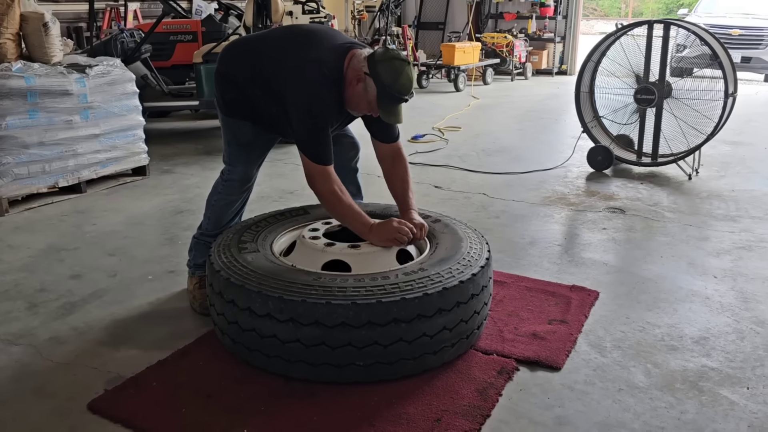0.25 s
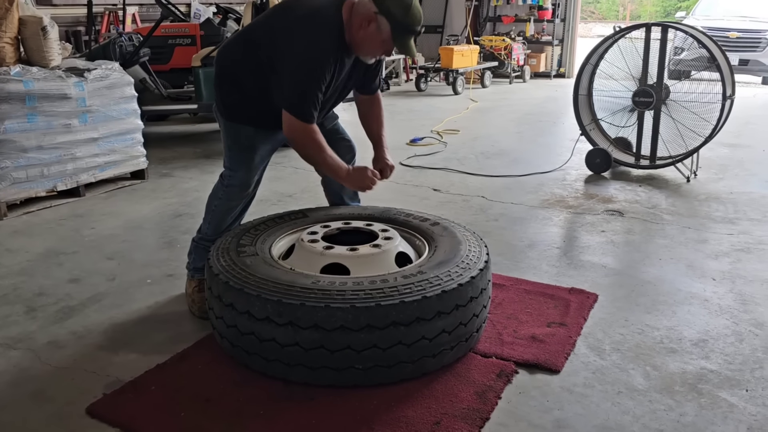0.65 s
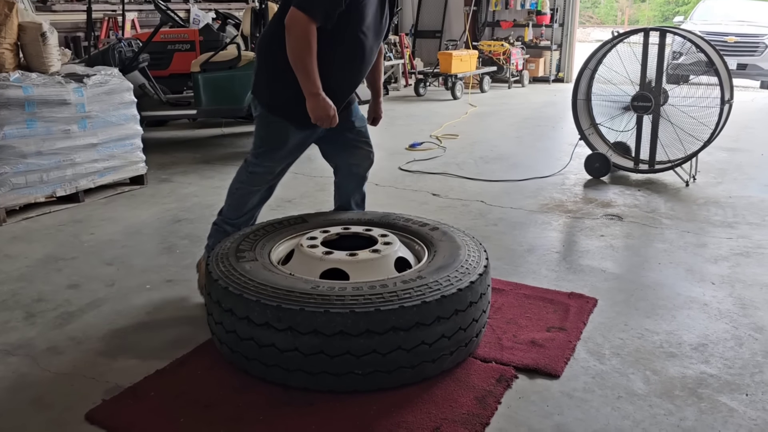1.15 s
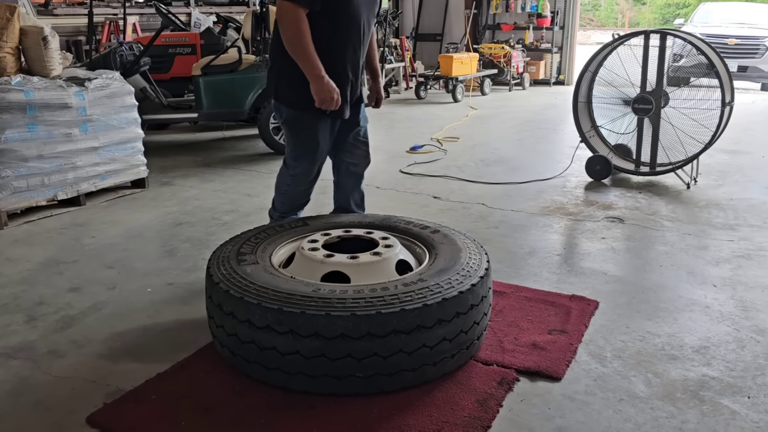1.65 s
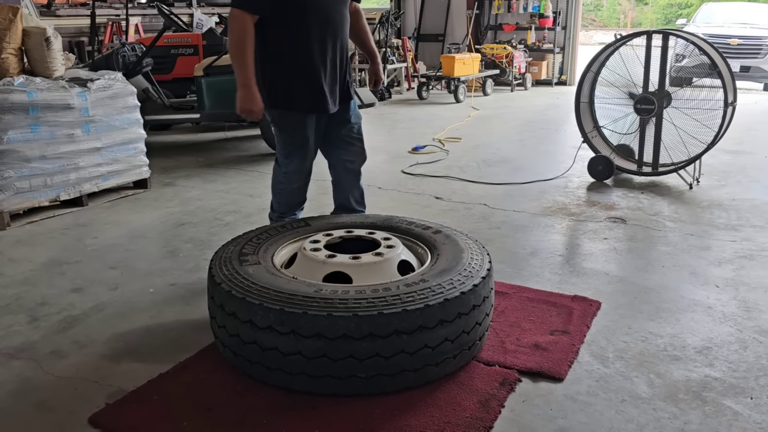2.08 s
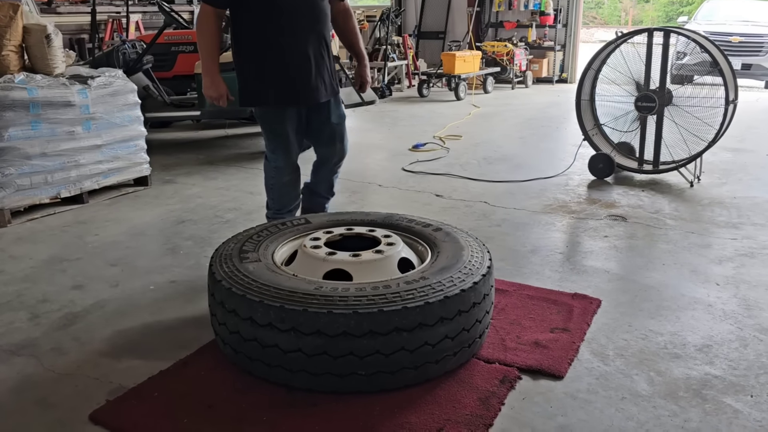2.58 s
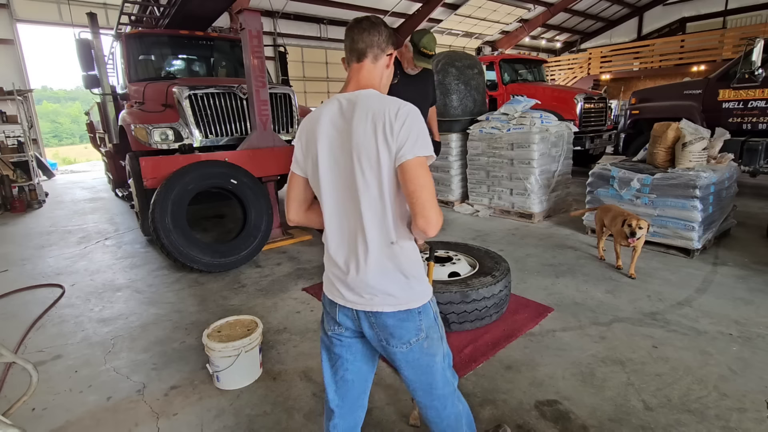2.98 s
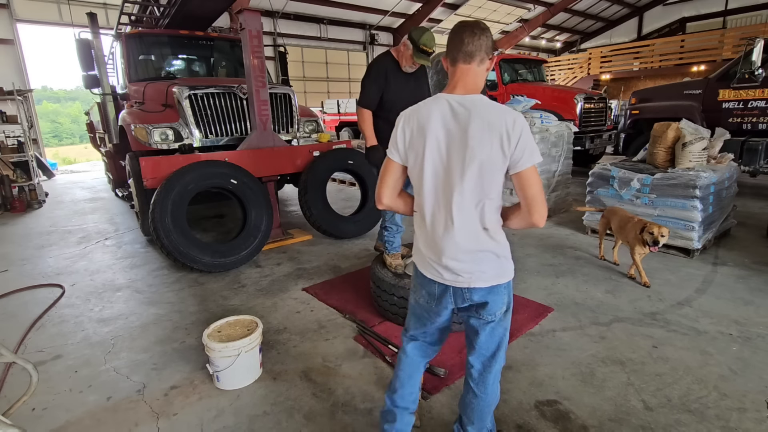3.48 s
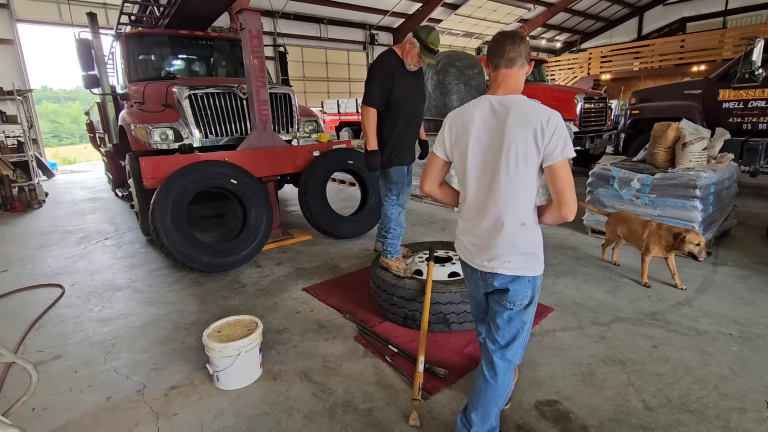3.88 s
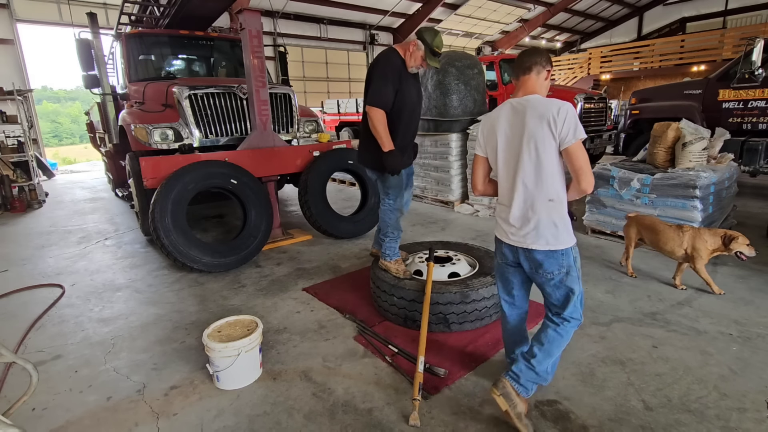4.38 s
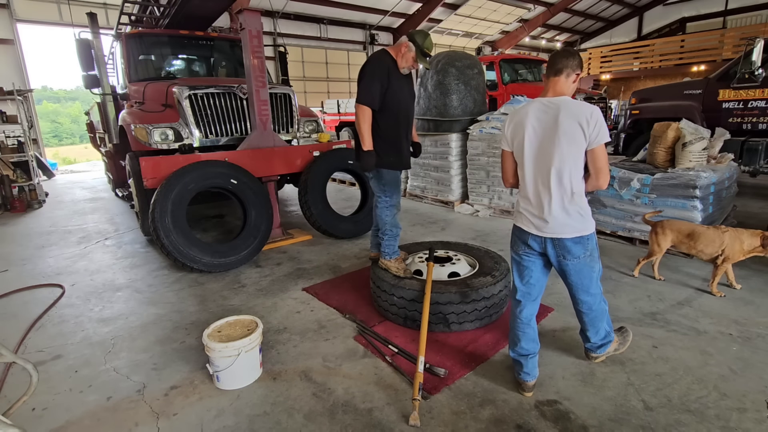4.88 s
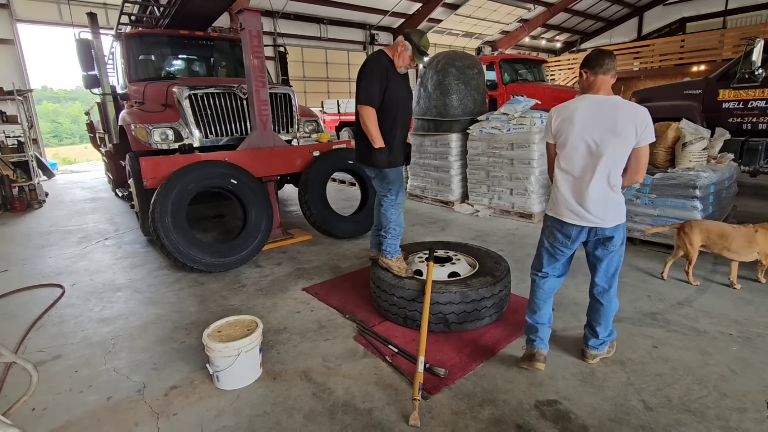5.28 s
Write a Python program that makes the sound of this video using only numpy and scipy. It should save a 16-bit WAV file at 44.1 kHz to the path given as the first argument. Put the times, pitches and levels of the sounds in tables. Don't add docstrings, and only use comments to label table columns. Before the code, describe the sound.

From the very start, air rushes loudly out of a truck tyre valve, close to a stereo microphone. The first 0.1 second has a slight pop with low buffeting and a quick pinch; until about 0.4 the jet beats on hands, denser and fluttering, then muffled by palms before they let go. From 0.5 to 3.0 it is a steady, bright, wide hiss with thin breathy whistles, slowly opening up a little, with small flaps near 2.5 and 2.9. A drum fan drones low beneath, and soft low thuds fall near 0.1 and 0.95. At 3.0 a hard cut stops the hiss. Much quieter, the fan now hums and flutters from the right in a concrete hall. Faint dry scuffs of boots and paws patter from 3.15 to 5.4, with a dull footfall at 3.5 and a short hard knock at 4.35. The fan continues to the end, about 5.5 seconds.

```python
import sys
import numpy as np
from scipy import signal
from scipy.fft import rfft, irfft, next_fast_len
from scipy.io import wavfile

SR = 44100
rng = np.random.default_rng(int(sys.argv[2]) if len(sys.argv) > 2 else 0)


def digitize_waveform(pressure):
    field = np.atleast_2d(pressure).T
    bounded = np.clip(field, -1, 1)
    quanta = np.round(bounded * 32767).astype(np.int16)
    wavfile.write(sys.argv[1], SR, quanta)


def volts_from_db(level):
    exponent = np.asarray(level, float) / 20
    return 10 ** exponent


N = 244266
SIZE = next_fast_len(N)
HZ = np.maximum(np.arange(SIZE // 2 + 1) * SR / SIZE, 1)

# frequency in Hz, density in dB per Hz.
JET_COLOUR = [(290, -33), (500, -23), (900, -21), (1500, -17), (2500, -7.5), (3000, -4.5), (3500, -3.5),
              (4420, -3), (5720, -2.5), (7410, 0.5), (9500, -1.5), (11700, 2), (14000, -4), (15500, -3.5)]
HANDS_COLOUR = [(210, -50), (350, -22), (460, -13), (920, -6), (1850, 1.5), (2700, 7.5), (3420, 5),
                (4500, 4.5), (5150, 2.5), (5500, 1), (5980, 3), (6600, 0.5), (8050, 7), (9300, -2),
                (10200, 12), (11600, 6), (14000, 0.5), (15500, 0.5)]
# frequency in Hz, width in Hz, height over hiss in dB.
WHISTLES = [(1500, 90, 3), (1880, 90, 4), (2672, 25, 4), (4520, 60, 3), (6100, 200, 2), (6505, 30, 4),
            (6970, 30, 3), (7205, 40, 4), (7750, 60, 2), (11350, 40, 3), (11714, 40, 4), (12165, 50, 3),
            (14250, 200, 2), (15250, 350, 5)]
# frequency in Hz, width in Hz, gain in dB.
HOLLOWS = [(1193, 110, -13.5), (1687, 120, -8), (2014, 43, -10.5), (2535, 540, -9.5), (5140, 230, 9),
           (6070, 250, 3.5), (10600, 1340, -9)]
# frequency in Hz, width in Hz, gain in dB.
SLITS = [(2880, 50, -6), (3200, 70, -11), (3620, 60, -8), (5100, 80, -10), (5950, 80, -6)]
# frequency in Hz, width in Hz, gain in dB.
NEAR_HANDS = [(3100, 140, -19), (4450, 100, -6), (5100, 70, -10), (5460, 440, 1.5), (5760, 85, -7),
              (10400, 800, -5), (13000, 5500, 4)]
# frequency in Hz, gain in dB.
FINGERS_COLOUR = [(1000, 6), (2200, 0.5), (3200, -24), (5000, 3), (7000, -7), (10000, 3), (15000, 3)]
# frequency in Hz, gain in dB.
PALMS_COLOUR = [(500, 7.5), (1100, 1.5), (2500, -1), (4000, -0.7), (8000, 1.8), (11000, -9), (15000, -10)]
# time in seconds, peak in dB.
RIM_FLAPS = [
    (2.51, -30),
    (2.9, -28),
]
WAVERING_HZ = [1950, 2180, 2480, 2700, 2920, 3130, 3260, 3480, 3720, 3950, 4150, 5100]
# frequency in Hz, width in Hz, start and end in seconds.
FINGER_GAPS = [(5150, 90, 0, .2), (5950, 90, .03, .19), (4330, 50, 0, .08), (3200, 70, 0, .07),
               (5750, 70, .32, .42), (10050, 170, .1, .36)]
# frequency in Hz, likeness from 0 to 1, left lag in radians.
JET_PORTS = [(100, .95, 0), (700, .75, 0), (1050, .75, 0), (1200, .4, -2.5), (1500, .45, -.3),
             (2200, .4, .7), (2800, .68, .2), (3700, .58, -.2), (4300, .32, -1.2), (5200, .38, -2.6),
             (6200, .25, -3), (7500, .42, -1), (9000, .28, -2.4), (15000, .3, -1.7)]
HANDS_PORTS = [(100, .9, 0), (900, .9, 0), (1400, .5, -.5), (2400, .45, .3), (2750, 1, 0), (3500, .98, 0),
               (4100, .45, -1), (5200, .5, -2.5), (6500, .4, -2), (8000, .7, -.8), (9000, .5, -2.5),
               (9700, .95, -3.1), (10700, .97, -3.1), (11200, .65, -1.5), (15000, .6, -1.5)]
FAN_PORTS = [(30, .82, 0), (100, .93, 0), (300, .92, 0), (700, .8, 0), (1200, .72, 0), (1900, .4, 0),
             (2400, .45, 0), (3200, .15, 0), (15000, .15, 0)]
# multiple of blade rate, rms near the tyre in dB, rms after the change in dB.
BLADES = [(1, -58, -55), (1.4, -47.5, -58), (2, -73, -45.5), (3, -50, -40.5), (4, -39.5, -37.5),
          (5, -46.5, -37), (6, -42, -65), (7, -48, -42), (8, -38.5, -47), (9, -51, -40), (10, -59, -44),
          (11, -65, -43), (12, -63.5, -48.5), (13, -87, -51.5)]
# frequency in Hz, density in dB per Hz.
DRONE_NEAR = [(20, -18), (40, -10), (100, -0.5), (180, -0.5), (260, 0.2), (300, -5.5), (360, -12.5),
              (400, -22), (500, -16.5), (900, -20.5), (1500, -19.5), (15000, -38)]
DRONE_AFTER = [(12, -34.5), (20, -12), (44, -7), (130, -7.5), (300, -6.5), (414, -10.5), (612, -12.5),
               (1070, -19.5), (2020, -26.5), (4000, -32), (7500, -40), (9500, -42), (12000, -40.5),
               (14800, -44), (15500, -55)]
# start in seconds, peak in dB, frequency in Hz, t60 in seconds.
THUDS = [
    (.08, -24, 50, .15),
    (.95, -22, 45, 0.13),
    (3.52, -24, 58, 0.32),
    (4.347, -18, 574, 0.026),
]
# time in seconds, peak in dB.
SCUFFS = [(3.15, -53), (3.6, -55), (3.73, -49.5), (3.93, -49), (4.2, -54), (4.3, -51), (4.42, -50),
          (4.61, -50), (4.74, -57), (4.83, -49.5), (5.15, -53), (5.22, -49), (5.36, -53), (5.415, -49)]
# frequency in Hz, density in dB per Hz.
SHUFFLE_COLOUR = [(800, -26), (2500, -1.5), (4200, 2.5), (6000, 0.5), (7500, 2), (8200, 3.5), (9000, -5),
                  (11500, -2.5), (13300, -6), (14500, -3), (15500, -10)]
# frequency in Hz, width in Hz, gain in dB.
HALL_DIP = [(10250, 350, -8), (13400, 350, -5), (15400, 400, -5)]
# frequency in Hz, left minus right in dB.
PORT_TILT = [(100, 0), (400, .2), (1000, .5), (4500, -1), (6000, 3), (7300, 8), (8400, 8.5), (9700, 4),
             (10100, 0), (13000, 2.6), (15000, 1)]
# frequency in Hz, width in Hz, gain in dB.
PORT_DIP = [(10120, 400, -5), (10750, 300, 0)]

JET_DB, SHADE_DB, LEAN_S, LEANT_S, STEP_BACK_S = -16, -5.5, 0.076, 0.46, 0.92
POP_DB, POP_BUFFET_DB, POP_S = 1.5, 9, 0.035
SQUEEZE_DB, SQUEEZE_S, SQUEEZE_LASTS_S = -3, 0.1, 0.076
FINGERS_DB, CUPPED_DB, CLOSE_S, CLOSING_S = -29, -14, 0.048, 0.039
SAG_DB_PER_S, OPEN_S, LET_GO_DB_PER_S = -18, 0.35, -120
CUP_FORMS_S, PALMS_S, PALMS_FLATTEN_S = 0.1, 0.2, 0.055
HANDS_GONE_S, HANDS_LEAVING_S = 0.33, 0.24
FLAP_S = 0.034
WAVER_WIDTH_HZ, WAVER_RATE_HZ, WAVER_RARE = 55, 5, 0.9
ECHO_MIN_S, ECHO_MAX_S, JET_ECHO_SHARE = 0.002, 0.03, 0.28
FAN_NEAR_DB, FAN_AFTER_DB = -36, -32
BLADE_NEAR_HZ, BLADE_AFTER_HZ = 30.42, 30.33
AFTER_LAG_S = 0.00043
SCUFF_RISE_S, SCUFF_FALL_DB_PER_S, PATTER_DB = 0.019, -87, -53
CHANGE_S, FADE_OUT_S, FADE_IN_S = 2.9938, 0.0025, 0.028
CUTOFF_HZ, EDGE_HZ = 15480, 160


def ramp(start_s, length_s):
    return np.clip((np.arange(N) / SR - start_s) / length_s, 0, 1)


def since(start_s):
    return np.maximum(np.arange(N) / SR - start_s, 0)


def bell(centre_s, length_s):
    return np.exp(-((np.arange(N) / SR - centre_s) / length_s) ** 2)


def drift(rate_hz):
    pole = np.exp(-2 * np.pi * rate_hz * 40 / SR)
    noise = rng.standard_normal(N // 40 + 2002)
    slow = signal.lfilter([1], [1, -2 * pole, pole * pole], noise)[2000:]
    slow = slow - slow.mean()
    slow = slow / np.sqrt(np.mean(slow ** 2) + 1e-20)
    return np.interp(np.arange(N) / 40, np.arange(len(slow)), slow)


def over_hz(rows, axis=1):
    table = np.array(rows)
    return np.interp(np.log(HZ), np.log(table[:, 0]), table[:, axis])


def humps(rows):
    return sum(db / (1 + (2 * (HZ - hz) / width_hz) ** 2) for hz, width_hz, db in rows)


def recolour(x, colour_db):
    return irfft(rfft(x, SIZE) * volts_from_db(colour_db), SIZE)[:, :N]


def echoes(share):
    lags_s = rng.uniform(ECHO_MIN_S, ECHO_MAX_S, (6, 1)) + rng.uniform(-0.0002, 0.0002, (2, 6, 1))
    return 1 + share * np.exp(-2j * np.pi * HZ * lags_s).sum(1)


def air(colour_db, ports, shared_db, patchy_db, rate_hz, lag_s=0, echo_share=0.08):
    direct, left, right = rfft(rng.standard_normal((3, SIZE)))
    alike = np.clip(over_hz(ports), 0, 1)
    turn = np.exp(-0.5j * (over_hz(ports, axis=2) + 2 * np.pi * HZ * lag_s))
    common = np.sqrt(alike) * direct * echoes(echo_share) * np.array([turn, 1 / turn])
    separate = np.sqrt(1 - alike) * np.array([left, right])
    pair = (common + separate) * volts_from_db(colour_db)
    out, together_db = 0, shared_db * drift(rate_hz)
    for octave in range(5, 15):
        window = np.cos(np.pi / 2 * np.clip(np.log2(HZ) - octave, -1, 1)) ** 2
        band = irfft(pair * window, SIZE)[:, :N]
        out = out + band * volts_from_db(together_db + patchy_db * drift(rate_hz))
    return out / np.sqrt(np.mean(out.mean(0) ** 2))


def free_level():
    shade = ramp(LEAN_S, LEANT_S - LEAN_S) * np.exp(-since(LEANT_S) / STEP_BACK_S)
    pop_db = POP_DB * bell(0, POP_S)
    squeeze_db = SQUEEZE_DB * bell(SQUEEZE_S, SQUEEZE_LASTS_S)
    return volts_from_db(JET_DB + pop_db + SHADE_DB * shade + squeeze_db)


def struck_level():
    hands_db = FINGERS_DB + (CUPPED_DB - FINGERS_DB) * ramp(CLOSE_S, CLOSING_S)
    hands_db = hands_db + SAG_DB_PER_S * since(CLOSE_S + CLOSING_S)
    hands_db = hands_db + LET_GO_DB_PER_S * since(OPEN_S)
    return volts_from_db(hands_db) + sum(volts_from_db(db) * bell(s, FLAP_S) for s, db in RIM_FLAPS)


def free_jet():
    colour_db = over_hz(JET_COLOUR) + humps(WHISTLES) + humps(SLITS) + 0.73 * humps(HOLLOWS)
    hiss = air(colour_db, JET_PORTS, shared_db=0.26, patchy_db=0.08, rate_hz=2.5,
               echo_share=JET_ECHO_SHARE)
    gone = ramp(HANDS_GONE_S, HANDS_LEAVING_S)
    hiss = gone * hiss + (1 - gone) * recolour(hiss, humps(NEAR_HANDS))
    return free_level() * hiss


def struck_hands():
    colour_db = over_hz(HANDS_COLOUR) + 2 * humps(SLITS[3:]) + humps(HOLLOWS)
    beat = air(colour_db, HANDS_PORTS, shared_db=0.7, patchy_db=0.7, rate_hz=22,
               echo_share=JET_ECHO_SHARE)
    closed = ramp(CLOSE_S, CUP_FORMS_S)
    beat = closed * beat + (1 - closed) * recolour(beat, over_hz(FINGERS_COLOUR))
    flat = ramp(PALMS_S, PALMS_FLATTEN_S)
    beat = (1 - flat) * beat + flat * recolour(beat, over_hz(PALMS_COLOUR))
    return struck_level() * beat


def narrow(spectrum, hz, width_hz):
    return irfft(spectrum * np.exp(-((HZ - hz) / width_hz) ** 4), SIZE)[:, :N]


def narrow_dropouts(x):
    out, spectrum = x, rfft(x, SIZE)
    for hz in WAVERING_HZ:
        lost = np.clip(3 * (drift(WAVER_RATE_HZ) - WAVER_RARE), 0, 0.9) * ramp(0.22, 0.05)
        out = out - lost * narrow(spectrum, hz, WAVER_WIDTH_HZ)
    for hz, width_hz, start_s, end_s in FINGER_GAPS:
        lost = 0.9 * ramp(start_s - 0.01, 0.01) * (1 - ramp(end_s, 0.02))
        out = out - lost * narrow(spectrum, hz, width_hz)
    return out


def blades(column, blade_hz, lag_s, wobble_db, slip_rad):
    t = np.arange(N) / SR - np.array([[lag_s], [0]])
    out = 0
    for row in BLADES:
        phase = 2 * np.pi * rng.random() + slip_rad * drift(1.9)
        height = np.sqrt(2) * volts_from_db(row[column] + wobble_db * drift(2.7))
        out = out + height * np.sin(2 * np.pi * row[0] * blade_hz * t + phase)
    return out


def fan_near():
    drone = air(over_hz(DRONE_NEAR), FAN_PORTS, shared_db=0.3, patchy_db=0.6, rate_hz=12)
    level = volts_from_db(FAN_NEAR_DB + POP_BUFFET_DB * bell(0, 1.9 * POP_S))
    return level * drone + blades(1, BLADE_NEAR_HZ, lag_s=0, wobble_db=0.7, slip_rad=0.15)


def thuds():
    out = np.zeros(N)
    for start_s, db, hz, t60_s in THUDS:
        t = since(start_s)
        out += volts_from_db(db - 60 * t / t60_s) * np.sin(2 * np.pi * hz * t) * (1 - np.exp(-t * hz * 2))
    return out


def fan_after():
    drone = air(over_hz(DRONE_AFTER) + humps(HALL_DIP), FAN_PORTS, shared_db=0.4, patchy_db=1.2,
                rate_hz=8, lag_s=AFTER_LAG_S)
    tones = blades(2, BLADE_AFTER_HZ, lag_s=AFTER_LAG_S, wobble_db=2.2, slip_rad=0.35)
    return volts_from_db(FAN_AFTER_DB) * drone + tones


def scuff_level():
    power = volts_from_db(PATTER_DB) ** 2
    for s, db in SCUFFS:
        rise = ramp(s - SCUFF_RISE_S, SCUFF_RISE_S)
        power = power + (rise * volts_from_db(db + SCUFF_FALL_DB_PER_S * since(s))) ** 2
    return np.sqrt(power)


def shuffle():
    colour_db = over_hz(SHUFFLE_COLOUR) + humps(HALL_DIP)
    return scuff_level() * air(colour_db, FAN_PORTS, shared_db=0, patchy_db=0, rate_hz=10)


def scene():
    t = np.arange(N) / SR
    before = np.clip((CHANGE_S - t) / FADE_OUT_S, 0, 1)
    after = np.clip((t - CHANGE_S) / FADE_IN_S + 0.039, 0, 1) * (t > CHANGE_S - FADE_OUT_S)
    tyre = narrow_dropouts(free_jet() + struck_hands()) + fan_near()
    hall = fan_after() + shuffle()
    return before * tyre + after * hall + thuds()


def roll_off(x):
    return signal.sosfilt(signal.butter(12, 15700, fs=SR, output="sos"), x)


def record(dry):
    tilt = volts_from_db(over_hz(PORT_TILT) * np.array([[0.5], [-0.5]]))
    even = volts_from_db(humps(PORT_DIP)) / np.sqrt(np.mean(tilt ** 2, 0))
    top_cut = np.sin(np.pi / 2 * np.clip((CUTOFF_HZ - HZ) / EDGE_HZ + 0.5, 0, 1)) ** 2
    ports = irfft(rfft(dry, SIZE) * tilt * even * top_cut, SIZE)[:, :N]
    return roll_off(np.clip(ports, -1, 1))


dry = scene()
out = record(dry)
digitize_waveform(out)
```